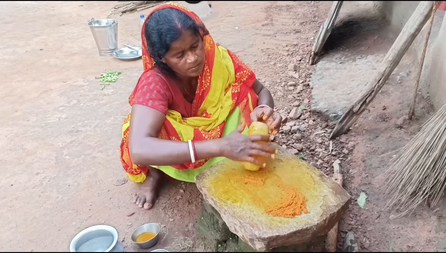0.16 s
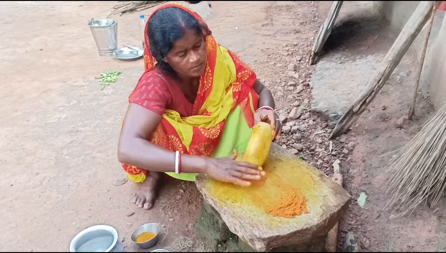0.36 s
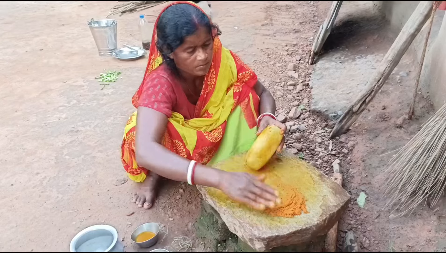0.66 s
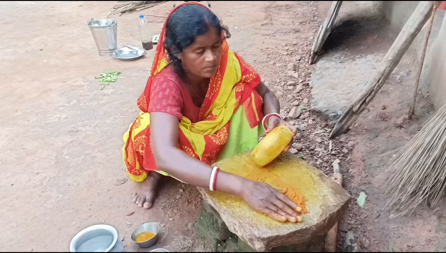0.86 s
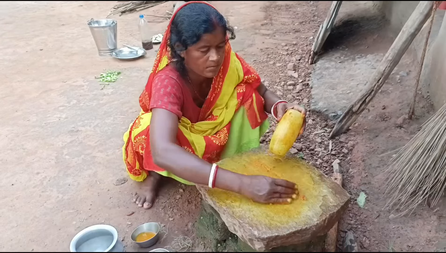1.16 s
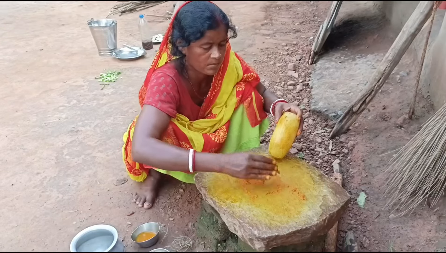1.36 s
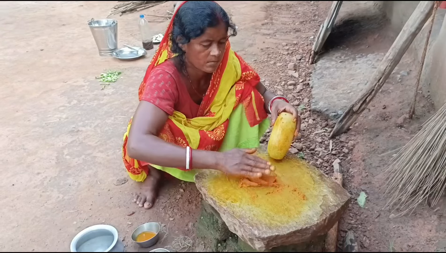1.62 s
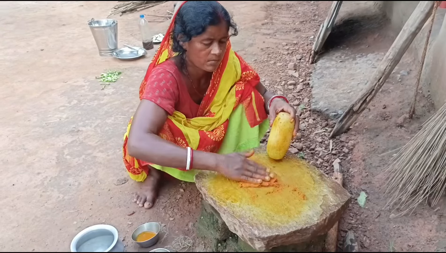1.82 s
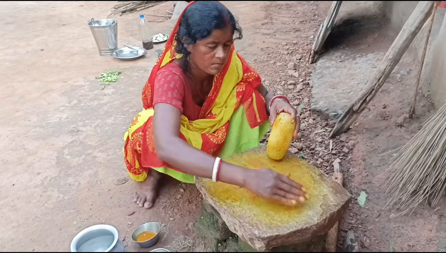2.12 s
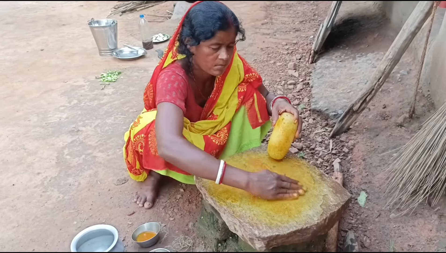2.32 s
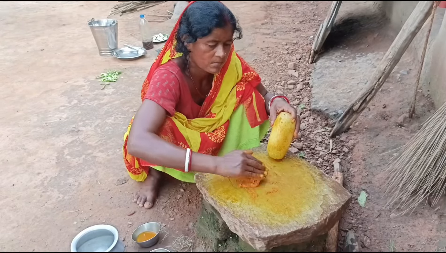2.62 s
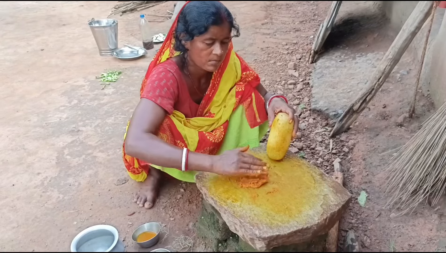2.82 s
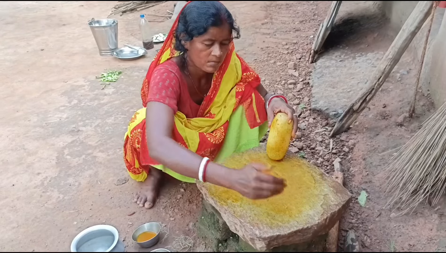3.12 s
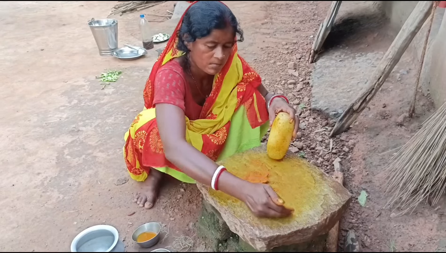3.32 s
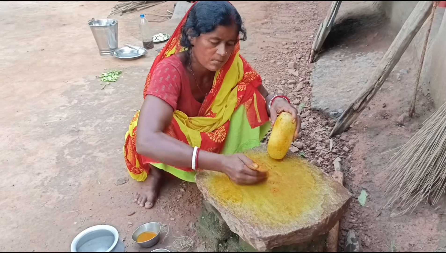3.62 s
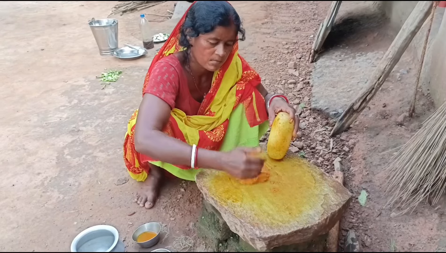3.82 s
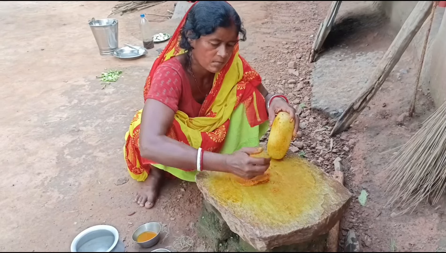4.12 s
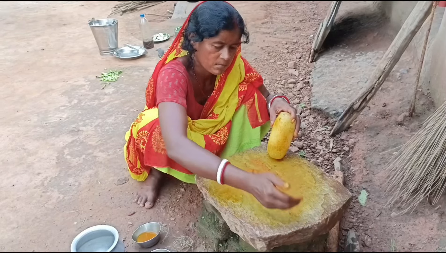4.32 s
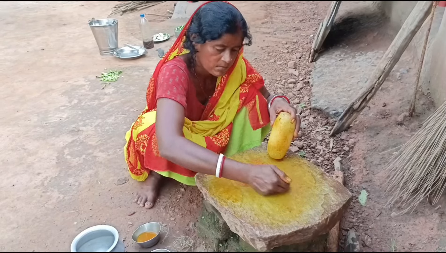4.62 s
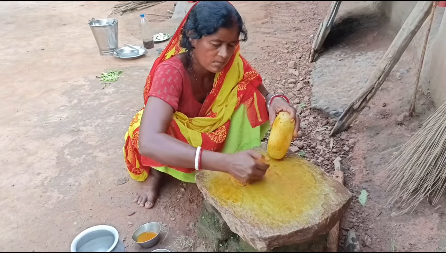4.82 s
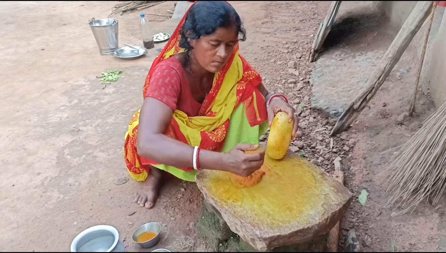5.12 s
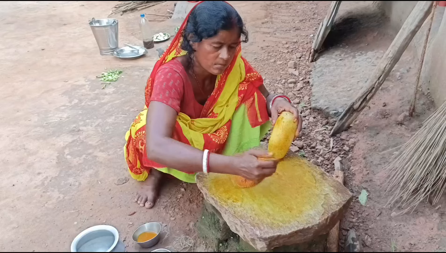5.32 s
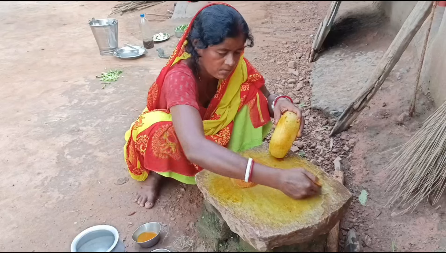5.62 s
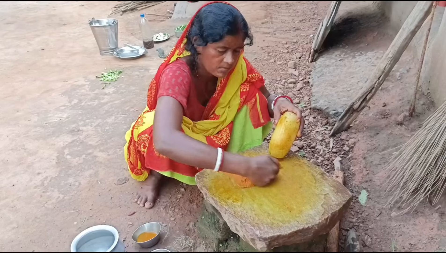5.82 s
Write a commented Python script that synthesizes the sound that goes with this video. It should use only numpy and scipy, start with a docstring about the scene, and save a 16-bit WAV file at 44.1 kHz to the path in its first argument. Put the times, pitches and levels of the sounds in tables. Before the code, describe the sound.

In an open village yard, a hand sweeps wet spice paste across a stone slab with soft gritty hisses and small sticky smacks. A bird whistles first, a distant horn blasts briefly, then one loud stone knock bounces. A small engine draws nearer later, under far bird chatter, a rapid falling trill and a thin insect tone. The microphone is fairly near the slab.

```python
"""A bird whistles over a single-cylinder engine on the road, far chatter and an insect's thin tone; a horn blasts once.
A hand wipes wet spice paste across a stone slab in a village yard: soft hiss, sticky smacks, a knock that bounces.
The engine draws near as firing pulses and noise through resonances; birds are gliding sines, flock and insect noise bands.
The wipe is shaped noise and crackle, smacks are noise bursts, knocks damped sines, the horn wavering partials."""
import sys
import numpy as np
from scipy import signal
from scipy.fft import rfft, irfft
from scipy.io import wavfile
from scipy.ndimage import uniform_filter1d

SR = 44100
rng = np.random.default_rng(int(sys.argv[2]) if len(sys.argv) > 2 else 0)


def pcm_store(signal):
    """Save signal as 16-bit PCM."""
    levels = np.round(np.clip(np.atleast_2d(signal), -1, 1) * 32767)
    wavfile.write(sys.argv[1], SR, levels.astype(np.int16).T)


N = 262836
T = np.arange(N) / SR

# Spectrum of road and palm hiss. Each row: frequency in Hz, relative level in dB.
HISS_SPECTRUM = [(1500, -10), (2500, -11.5), (4000, -3), (5300, -2), (6200, -2.5), (7200, 2), (9500, -4.5),
                 (11500, -12), (13000, -19.5)]
# Spectrum of the wet film's fizz. Each row: frequency in Hz, relative level in dB.
FIZZ_SPECTRUM = [(9000, -26), (12000, -23), (13500, -17), (15500, -10.5)]


def gain_of(db):
    """Amplitude factor of a level in dB."""
    return 10 ** (np.asarray(db) / 20)


def evened(x):
    """Scales to rms 1."""
    return x / np.sqrt(np.mean(x ** 2) + 1e-20)


def curves(rows):
    """Every column of a table after its times, interpolated at each sample."""
    s, *columns = np.transpose(rows)
    return [np.interp(T, s, c, left=c[0], right=c[-1]) for c in columns]


def resonate(x, hz, width_hz):
    """A resonance of gain 1, fixed or moving: shift down to zero, smooth, shift back."""
    turn = np.exp(2j * np.pi * np.cumsum(hz * np.ones(N)) / SR)
    r = np.exp(-np.pi * width_hz / SR)
    return 2 * (turn * signal.lfilter([1 - r], [1, -r], x / turn)).real


def body(x, modes):
    """Several resonances side by side, each passed twice for steep skirts."""
    return sum(gain_of(db) * resonate(resonate(x, hz, width_hz), hz, width_hz) for hz, width_hz, db in modes)


def coloured(x, points):
    """Shapes the spectrum by (Hz, dB) points, on a log frequency axis."""
    point_hz, point_db = np.transpose(points)
    bin_hz = np.fft.rfftfreq(N, 1 / SR)
    shape_db = np.interp(np.log(bin_hz + 1), np.log(point_hz), point_db)
    return irfft(rfft(x) * gain_of(shape_db), N)


def drift(seconds):
    """Slow chance of rms 1: noise averaged twice over this time."""
    size = max(round(seconds * SR), 1)
    return evened(uniform_filter1d(uniform_filter1d(rng.standard_normal(N), size), size))


def yard(x, t60_s, dull):
    """Sparse reflections of random sign from walls and trees, different for each channel."""
    t = T[:SR // 2]
    signs = rng.choice([-1., 1.], (2, len(t)))
    struck = rng.random((2, len(t))) < 2000 / SR  # 2000 reflections per second
    taps = signs * struck * (t > .004) * gain_of(-60 * t / t60_s)
    taps = signal.lfilter([1], [1, -np.clip(dull, 0, .95)], taps)
    return signal.fftconvolve(x[None], taps / np.linalg.norm(taps[0]), axes=1)[:, :N]


def arches(rows):
    """Joint gain of swells (start s, length s, dB), each a half sine to a power."""
    power = 0.89
    total = 0
    for s, length_s, db in rows:
        swell = np.sin(np.pi * np.clip((T - s) / length_s, 0, 1)) ** power
        total = total + (gain_of(db) * swell) ** 2
    return np.sqrt(total)


def glide(length_s, first_hz, middle_hz, last_hz):
    """A curved pitch path through three points."""
    curve = np.polyfit([0, .5, 1], [first_hz, middle_hz, last_hz], deg=2)
    return np.polyval(curve, np.linspace(0, 1, round(length_s * SR)))


def note(s, hz, db, pan_db, rough, fade_db=-6, size=90):
    """A near sine along the pitch curve hz, quick to start and fading; roughness smears it with noise."""
    u = np.linspace(0, 1, len(hz))
    noise = evened(uniform_filter1d(uniform_filter1d(rng.standard_normal(len(u)), size), size))
    tone = np.sqrt(2) * (1 - rough + rough * noise) * np.sin(2 * np.pi * np.cumsum(hz) / SR)
    out = np.zeros(N)
    out[round(s * SR):][:len(u)] = gain_of(db + 4 + fade_db * u) * tone * signal.windows.tukey(len(u), .2)
    return out * gain_of([[pan_db / 2], [-pan_db / 2]])  # positive pan is left


def engine():
    """Each firing thumps the pipe and lets out a puff of turbulence; intake and tyres roar with it."""
    # Each row: time in seconds, firings per second.
    firing = [(0.0, 16.53), (1.3, 17.84), (2.2, 18.99), (2.8, 20.15), (3.4, 20.64), (4.0, 21.14),
              (4.6, 21.89), (5.2, 22.95), (5.96, 23.42)]
    # Each row: time in seconds, exhaust level in dB, boom of the road between the walls in Hz,
    # intake roar level in dB, intake roar in Hz.
    course = [(0, -58, 145, -100, 700), (0.6, -60.5, 144, -92, 700), (0.9, -51, 127, -84, 710),
              (1.7, -56, 120, -76, 770), (2.3, -61.5, 105, -72.5, 774), (2.82, -52, 115, -74, 764),
              (2.95, -45, 129, -60.5, 766), (3.25, -46.5, 121, -63.5, 800), (3.6, -44.5, 121, -63, 783),
              (4.3, -47, 119, -63, 790), (4.85, -47.5, 122, -64, 780), (5.15, -50.5, 121, -60.5, 750),
              (5.3, -47, 123, -57, 817), (5.95, -46, 129, -59.5, 846)]
    # Exhaust modes. Each row: frequency in Hz, width per pass in Hz, relative level in dB.
    pipe_modes = [(160.2, 89, 1), (254.6, 46.4, 0), (358.6, 33.6, 1), (477.3, 14.4, -6.5)]
    first_turn = .3  # share of the cycle already done at the start
    tyre_hz, tyre_width_hz, tyre_db = 1800, 1100, -19.5  # dB relative to the exhaust
    road_hiss_db = -15  # relative to the exhaust

    level_db, boom_hz, roar_db, roar_hz = curves(course)
    turns = first_turn + np.cumsum(curves(firing)[0]) / SR + 0.024 * drift(.05)
    fired = np.diff(np.floor(np.maximum.accumulate(turns)), prepend=0) * gain_of(2.0 * drift(0.14))
    puff = .45 + np.exp(-(turns % 1) / .35)
    pipe = [(boom_hz, 55, 2.5)]
    pipe += [(hz * (1 + 0.055 * drift(.15)), width_hz, db) for hz, width_hz, db in pipe_modes]
    thumps = evened(body(fired, pipe))
    turbulence = evened(body(puff * rng.standard_normal(N), pipe))
    exhaust = evened(thumps + turbulence)

    intake_modes = [(roar_hz * (1 + 0.034 * drift(0.043)), 120, 0),
                    (1.147 * roar_hz, 130, -6), (0.68 * roar_hz, 90, -6)]
    intake = evened(body((0.9 + puff) * rng.standard_normal(N), intake_modes))
    tyres = gain_of(tyre_db) * evened(body(rng.standard_normal(N), [(tyre_hz, tyre_width_hz, 0)]))
    road_hiss = evened(coloured(rng.standard_normal(N), HISS_SPECTRUM))
    road_hiss = gain_of(road_hiss_db + 2.0 * drift(0.041)) * road_hiss
    return gain_of(level_db) * (exhaust + road_hiss + tyres) + gain_of(roar_db) * intake


def birds():
    """Whistles, chirps and the trill, whose notes come back off a wall; the yard adds a tail."""
    # Right bird. Each row: start in seconds, length in seconds, held pitch in Hz, start above it in Hz,
    # relative level in dB.
    whistles = [(0, .17, 4080, 0, -58.5), (.218, .25, 4560, 340, -58), (.485, .27, 3935, -90, -53),
                (.722, .14, 4395, 320, -55)]
    # Left bird. Each row: start in seconds, length in seconds, first, middle and last pitch in Hz,
    # relative level in dB, roughness 0-1.
    bends = [(.165, .05, 3150, 3560, 3640, -63, .15), (.21, .1, 3640, 3180, 2720, -61, .15),
             (4.185, .03, 3900, 4150, 4250, -61, .3), (4.21, .022, 4250, 3800, 3500, -58, .2),
             (4.215, .045, 3450, 3150, 2900, -60, .3), (5.36, .18, 4230, 4260, 4230, -57, .45),
             (5.39, .025, 4100, 3500, 3200, -52, .2), (5.41, .15, 3230, 3270, 3250, -52.5, .55),
             (5.49, .035, 2700, 2350, 1900, -62, .3)]
    # Birds further off. Each row: start in seconds, length in seconds, first and last pitch in Hz,
    # relative level in dB.
    chirps = [(1.46, .06, 2550, 2150, -63), (1.64, .06, 2900, 2350, -65), (1.78, .05, 2600, 2200, -64),
              (2.31, .045, 3600, 2850, -66), (2.61, .06, 3050, 2850, -66), (3.5, .035, 3100, 2880, -64),
              (3.69, .05, 2250, 2100, -65), (4.09, .06, 4950, 4750, -64), (4.42, .08, 2350, 2300, -63),
              (5.69, .05, 3250, 2800, -63), (5.7, .24, 1900, 1860, -67), (2.97, .09, 2700, 2550, -62),
              (3.075, .05, 7500, 7300, -58), (3.19, .05, 2200, 2060, -62), (3.55, .08, 2480, 2260, -62),
              (3.91, .09, 2200, 2050, -62), (4.005, .065, 3160, 3020, -62), (4.105, .125, 2220, 1960, -61),
              (4.225, .075, 3520, 3560, -61), (4.295, .092, 3600, 2740, -61), (4.77, .14, 2250, 1900, -66),
              (5.02, .14, 2150, 1870, -66), (5.575, .07, 5190, 5000, -61)]
    # Left bird's trill of falling notes: start of each in seconds.
    trill_starts = [4.437, 4.53, 4.625, 4.714, 4.809, 4.905, 5.002, 5.1, 5.202]
    trill_length_s, trill_first_hz, trill_db = .043, 4550, -55.5
    fall_left = .36  # share of the fall left at half time
    trill_end_hz, sink_hz_per_s = 2520, 680  # each note falls further than the one before
    wall_delay_s, wall_db = 0.0092, -4
    hook_s = .018  # time constant of the slide onto a whistle's pitch
    right_pan_db, left_pan_db = -3, 8

    held = 0
    for s, length_s, hz, hook_hz, db in whistles:
        path_hz = hz + hook_hz * np.exp(-T[:round(length_s * SR)] / hook_s)
        held = held + note(s, path_hz, db, right_pan_db, .2, fade_db=-17, size=350)
    bent = sum(note(s, glide(length_s, first_hz, middle_hz, last_hz), db, left_pan_db, rough)
               for s, length_s, first_hz, middle_hz, last_hz, db, rough in bends)
    trill = 0
    for s in trill_starts:
        end_hz = trill_end_hz - sink_hz_per_s * (s - trill_starts[0])
        middle_hz = end_hz + fall_left * (trill_first_hz - end_hz)
        path_hz = glide(trill_length_s, trill_first_hz, middle_hz, end_hz)
        trill = trill + note(s, path_hz, trill_db, left_pan_db, .1, fade_db=-2)
    echo = gain_of(wall_db) * np.roll(trill, round(wall_delay_s * SR), axis=1)
    far = sum(note(s, glide(length_s, first_hz, (first_hz + last_hz) / 2, last_hz), db - 3.5, 0, .22, fade_db=-2)
              for s, length_s, first_hz, last_hz, db in chirps)

    near = held + bent + trill + echo
    near_tail = gain_of(-4) * yard(near.mean(0), 0.35, 0.027)
    far_tail = gain_of(-6) * yard(far[0], 0.23, 0)[0]
    return near + near_tail + far + far_tail


def flock():
    """Many far birds: short falling notes at random, blurred, over noise in their bands, and bouts of cheeping."""
    # Each row: time in seconds, relative chatter level in dB.
    chatter = [(0, -70.5), (.6, -72.5), (1.0, -64), (1.8, -67), (2.84, -67), (2.93, -61), (4.1, -65),
               (5.0, -57.5), (5.95, -57.5)]
    # Each row: frequency in Hz, width per pass in Hz, relative level in dB.
    wash_bands = [(2290, 720, -0.97), (2700, 1820, -0.032)]
    # Bouts of high cheeping. Each row: start in seconds, length in seconds, level in dB, pitch in Hz.
    bouts = [(1.01, 0.14, -66, 4100), (1.266, 0.29, -62.5, 3990), (1.546, 0.17, -58.5, 4120),
             (1.86, 0.14, -66, 4060), (2.043, 0.16, -61.5, 3930), (2.333, 0.2, -68.5, 3940),
             (2.572, 0.18, -63, 3970), (2.853, 0.14, -60, 3940), (3.433, 0.12, -59.5, 4420),
             (3.89, 0.11, -60.5, 4340), (4.154, 0.26, -62, 4140), (4.5, 0.8, -68.5, 3970),
             (5.55, 0.23, -65, 4260)]

    level_db = curves(chatter)[0]
    starts, pitches = np.transpose(bouts)[[0, 3]]
    cheep_hz = pitches[np.maximum(np.searchsorted(starts, T) - 1, 0)]
    notes = 0
    for when, longer, fall, loud, high in rng.random((180, 5)):
        hz = 1900 + 3300 * high
        path_hz = glide(.03 + .05 * longer, hz * 1.05, hz, hz * (.97 - .08 * fall))
        notes = notes + note(5.8 * when, path_hz, 4 * (loud - .5), 0, .2)[0]
    wash = sum(body(rng.standard_normal(N), [band]) * gain_of(2.2 * drift(.05)) for band in wash_bands)
    cheeps = 0
    for _ in range(3):
        voice = body(rng.standard_normal(N), [(cheep_hz + 150 * drift(.04), 180, 0)])
        cheeps = cheeps + gain_of(2.5 * drift(.02)) * voice
    blurred = evened(yard(notes + cheeps, 0.021, .1))
    mix = evened(wash) + .55 * evened(notes) + .3 * evened(cheeps) + .3 * blurred
    return gain_of(level_db) * mix + arches([row[:3] for row in bouts]) * evened(cheeps)


def insect():
    """One thin wavering tone of narrow noise and wider bands that shimmer and wander."""
    # Each row: frequency in Hz, width per pass in Hz, level in dB.
    shimmer_bands = [(7190, 700, -72.5), (9380, 230, -90.5)]
    tone_hz, tone_width_hz, tone_db, pulses_per_s = 8470, 50, -71.5, 36

    pulse_db = 3 * np.sin(2 * np.pi * pulses_per_s * T + drift(.1))
    tone = evened(body(rng.standard_normal(N), [(tone_hz, tone_width_hz, 0)]))
    out = gain_of(tone_db + 1.5 * drift(0.25) + pulse_db) * tone
    for hz, width_hz, db in shimmer_bands:
        band = evened(body(rng.standard_normal(N), [(hz + 80 * drift(0.012), width_hz, 0)]))
        out = out + gain_of(db + 4.9 * drift(0.031)) * band
    return out


def air():
    """Slowly swelling background noise of the open yard."""
    # Each row: frequency in Hz, relative level in dB.
    air_spectrum = [(18, -49), (30, 5), (111, 0), (258, 0.5), (567, -12), (1350, -26.5), (3210, -28.5),
                    (3850, -17), (6180, -21.5), (7230, -17.5), (11000, -24), (12200, -68), (15900, -29)]
    level_db = -59.5
    return gain_of(level_db + 2.3 * drift(0.79)) * evened(coloured(rng.standard_normal(N), air_spectrum))


def wipe():
    """Grit under the palm: dense hiss plus fine crackle of the wet film parting."""
    # Palm strokes over the slab. Each row: start in seconds, length in seconds, hiss level in dB.
    strokes = [(.68, 0.33, -56), (1.03, 0.33, -59.5), (1.3, 0.35, -61), (1.85, 0.21, -64),
               (2.27, 0.2, -62.5), (2.88, 0.36, -62.5), (3.3, 0.35, -57), (3.95, 0.25, -68),
               (4.44, 0.38, -52.5), (5.5, 0.41, -54)]
    # Wet film parting as the palm lifts. Each row: start in seconds, length in seconds, fizz level in dB.
    peels = [(1.1, 0.21, -58), (1.3, 0.38, -55.5), (2.5, 0.1, -63), (2.74, 0.083, -56), (2.89, 0.11, -56),
             (3.6, 0.16, -50), (3.84, .12, -64), (4.08, 0.11, -66), (4.8, 0.13, -51), (5.03, 0.09, -57),
             (5.24, 0.08, -52), (5.86, 0.28, -52)]
    stroke_fizz_db = -9.5  # relative to the stroke's hiss
    damp_fizz_db = -71.5  # the wet paste ticks faintly all the time

    stroke = arches(strokes) * gain_of(0.42 * drift(0.046))
    fizz = np.hypot(arches(peels), gain_of(stroke_fizz_db) * stroke) + gain_of(damp_fizz_db)
    tick_gain = gain_of(5.0 * np.minimum(rng.exponential(1, N), 4))
    crackle = rng.standard_normal(N) * tick_gain * (rng.random(N) < 2000 / SR)  # 2000 ticks per second
    clumps = gain_of(0.96 * drift(0.0077))
    grit = rng.standard_normal(N) * gain_of(1.3 * drift(0.017))
    grit = grit + 0.4 * evened(crackle * gain_of(1.6 * drift(0.011)))
    film = rng.standard_normal(N) * clumps + 2.7 * evened(crackle * clumps)
    return stroke * evened(coloured(grit, HISS_SPECTRUM)) + fizz * evened(coloured(film, FIZZ_SPECTRUM))


def smacks():
    """Paste smacking loose: each smack is a noise burst over a few milliseconds, in low and top bands."""
    # Each row: start in seconds, relative level in dB, top relative to it in dB.
    smack_rows = [(0.198, -44, -17), (1.2122, -43, -17), (1.239, -36.5, -10), (1.268, -37, -20),
                  (1.489, -36.5, 2.5), (1.858, -32, -12), (2.435, -43, -7), (2.574, -51, 10),
                  (2.895, -28.5, -17), (2.8994, -26.5, -4), (3.534, -44, 3), (3.593, -36, -22),
                  (3.668, -35, -14), (3.703, -36.5, 1), (4.138, -41.5, 3), (4.807, -32, -25),
                  (4.8416, -30.5, -32), (4.854, -35, -11), (4.8874, -33.5, -4), (5.272, -33, -12)]
    # Each row: frequency in Hz, width per pass in Hz, relative level in dB.
    smack_modes = [(885, 160, -27), (5140, 3400, -6), (7650, 2500, -0.5), (8800, 970, -1.5)]
    attack_s, t60_s = 0.00067, 0.026

    low, top, t = np.zeros(N), np.zeros(N), T[:600]
    for s, db, top_db in smack_rows:
        envelope = gain_of(db - 60 * t / t60_s) * np.minimum(t / attack_s, 1)
        snap = envelope * rng.standard_normal((2, len(t)))
        at = slice(round(s * SR), round(s * SR) + len(t))
        low[at] += snap[0, :N - at.start]
        top[at] += gain_of(top_db) * snap[1, :N - at.start]
    return gain_of(-3.5) * body(low, smack_modes) + gain_of(15.5) * coloured(top, FIZZ_SPECTRUM)


def knocks():
    """A blunt, damped blow that leaves the stone's modes ringing faintly, with a tail from the yard."""
    # Each row: start in seconds, level in dB, pitch factor.
    blows = [(.232, -50, 1.01), (.956, -44, 1.1), (1.3821, -11.5, 1), (1.4268, -20, 1), (1.4441, -28, 1),
             (1.4508, -32, .8), (1.468, -38, .8), (1.859, -44, 1.15), (2.899, -39, 1.1), (4.265, -40, 1.7),
             (4.661, -42, 1.65), (4.751, -44, 1.6)]
    # Modes of the slab. Each row: frequency in Hz before the pitch factor, relative level in dB, t60 in seconds.
    stone_modes = [(75, -22, 0.15), (243, -21, 0.11), (386, -15, 0.046), (547, -14, 0.074),
                   (1027, 4, 0.0077), (1465, -12, 0.014), (1940, -19.5, 0.014), (2466, -22.5, 0.031)]
    contact_hz, contact_peak_s, contact_width_s = 760, .0016, .0012  # before the pitch factor
    dulling = 0.12  # a softer blow loses treble: dB per kHz for each dB below the hardest

    out, t = np.zeros(N), T[:9000]
    hardest_db = max(row[1] for row in blows)
    for s, db, pitch in blows:
        contact = np.exp(-((pitch * t - contact_peak_s) / contact_width_s) ** 2)
        contact = contact * np.sin(2 * np.pi * contact_hz * pitch * t)
        ring = 0
        for hz, mode_db, t60_s in stone_modes:
            loss_db = dulling * (hardest_db - db) * hz / 1000
            ring = ring + gain_of(mode_db - 60 * t / t60_s - loss_db) * np.sin(2 * np.pi * hz * pitch * t)
        ring = ring * (1 - np.exp(-(t / 0.0025) ** 2))  # soft onset
        out[round(s * SR):][:len(t)] -= gain_of(db) * (contact + ring)
    return out + gain_of(-19.5) * yard(out, 0.35, 0.49)[0]


def horn():
    """A buzzing diaphragm: upper partials that flutter on their way through the air, and a rattle."""
    # Each row: multiple of the pitch, relative level in dB.
    partials = [(5, 0), (6, -1), (7, 0), (8, -10)]
    # Rattle of the diaphragm. Each row: frequency in Hz, width per pass in Hz, relative level in dB.
    rattle_modes = [(2700, 280, -11), (3230, 880, -11), (7270, 460, -5.5)]
    start_s, release_s, pitch_hz = .635, .89, 458
    first_db, last_db = -52, -44
    attack_s, fall_db_per_s = .09, 190

    level_db = np.interp(T, [start_s, release_s], [first_db, last_db])
    level_db = level_db - fall_db_per_s * np.maximum(T - release_s, 0)
    level = np.clip((T - start_s) / attack_s, 0, 1) * gain_of(level_db)
    tone = sum(gain_of(db + 4 * drift(.018)) * np.sin(k * 2 * np.pi * pitch_hz * T + .7 * drift(.014))
               for k, db in partials)
    beats = (1.4 + np.cos(2 * np.pi * pitch_hz * T)) * rng.standard_normal(N)
    rattle = sum(gain_of(db) * evened(body(beats, [(hz, width_hz, 0)])) for hz, width_hz, db in rattle_modes)
    blast = level * (evened(tone) + rattle)
    return blast + gain_of(-9) * yard(blast, .45, 0)[0]


def scene():
    """Road, hand, insect and air in the middle; birds and flock in stereo."""
    middle = engine() + insect() + air() + wipe() + smacks() + knocks() + horn()
    return middle + birds() + flock()


def record(dry):
    """The microphone drops the deepest bass; then the band limit."""
    bass_cut_hz, edge_hz = 52, 15800
    thinned = signal.sosfilt(signal.butter(6, bass_cut_hz, "high", fs=SR, output="sos"), dry)
    band_limit = signal.firwin(511, edge_hz, window=("kaiser", 9), fs=SR)
    return signal.oaconvolve(thinned, band_limit[None], "same")


dry = scene()
out = record(dry)
pcm_store(out)
```